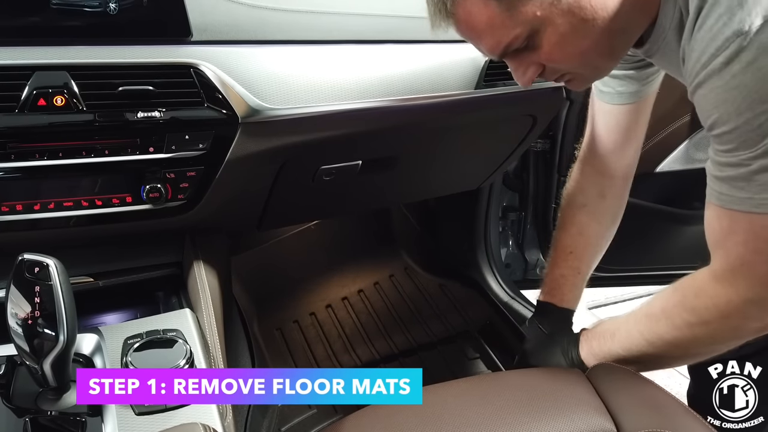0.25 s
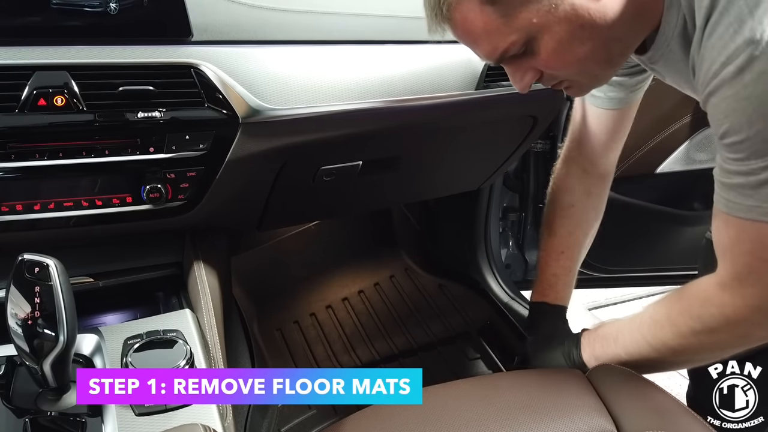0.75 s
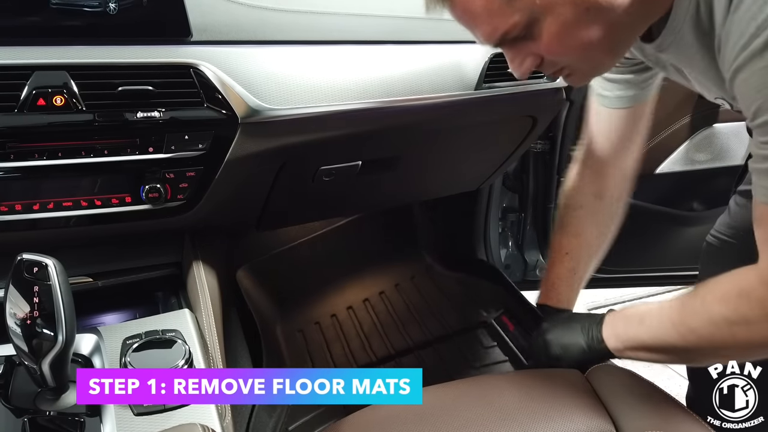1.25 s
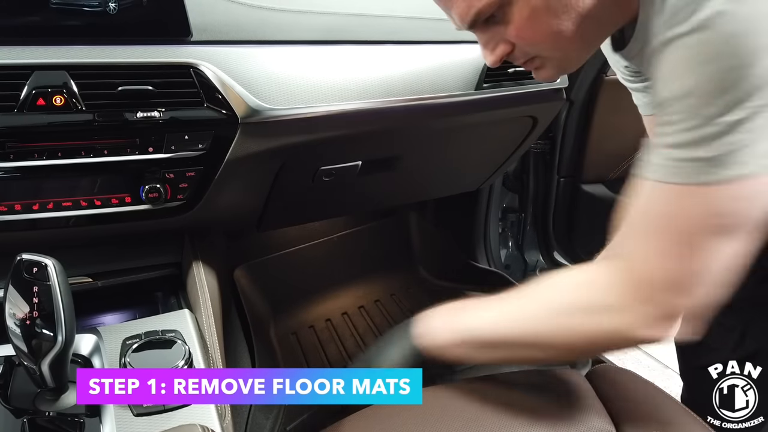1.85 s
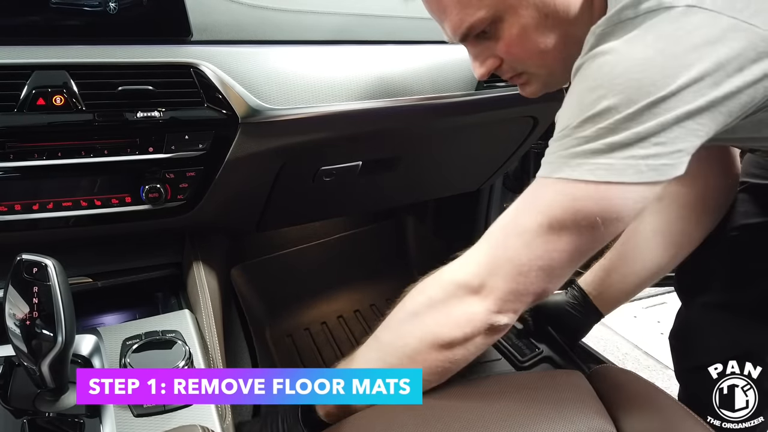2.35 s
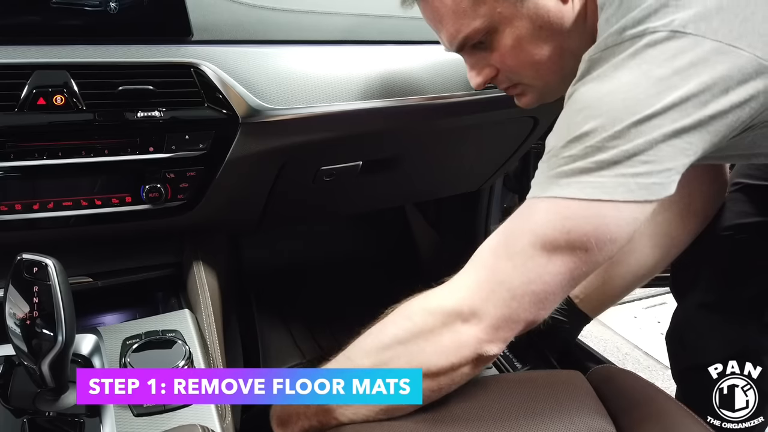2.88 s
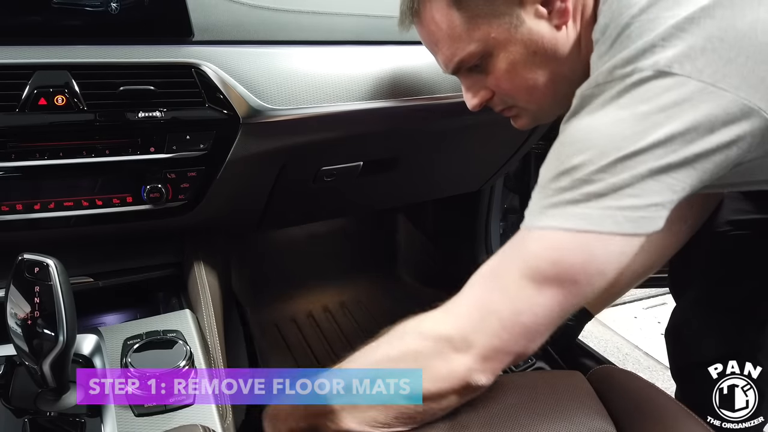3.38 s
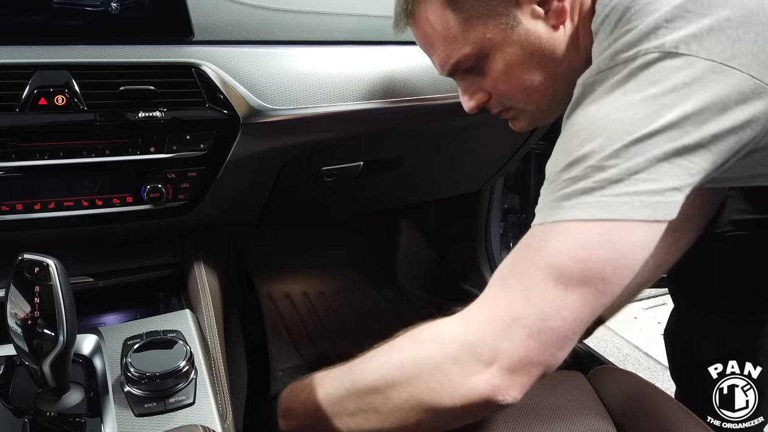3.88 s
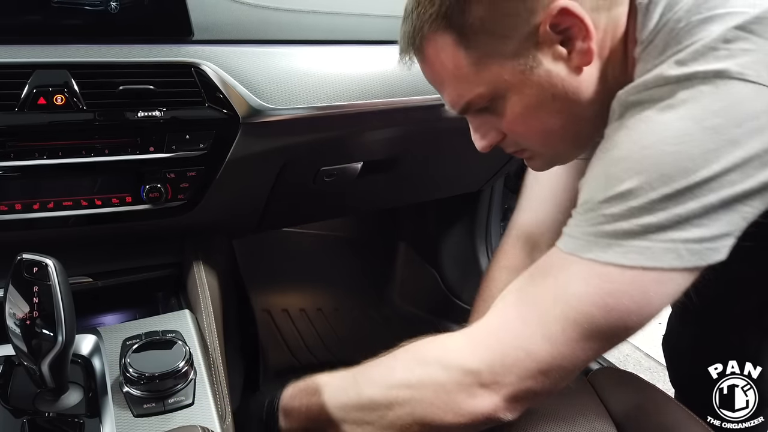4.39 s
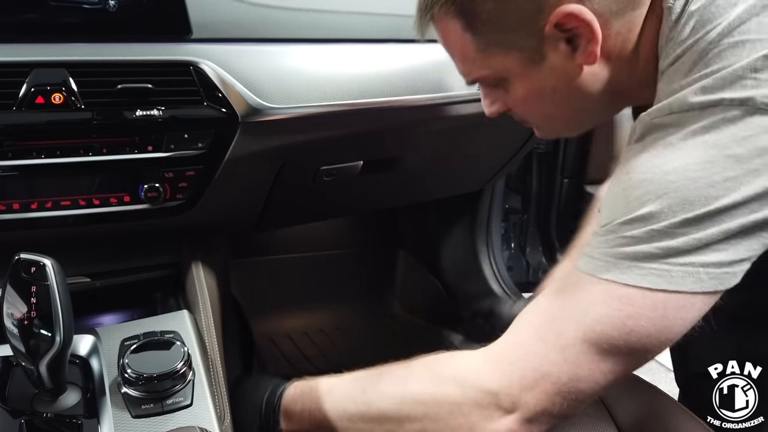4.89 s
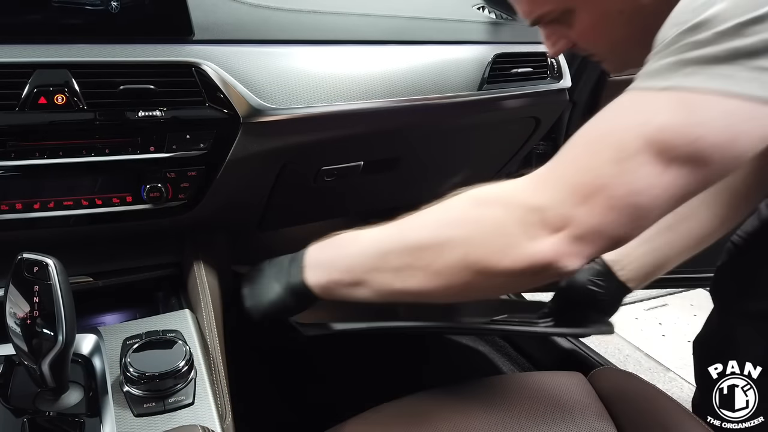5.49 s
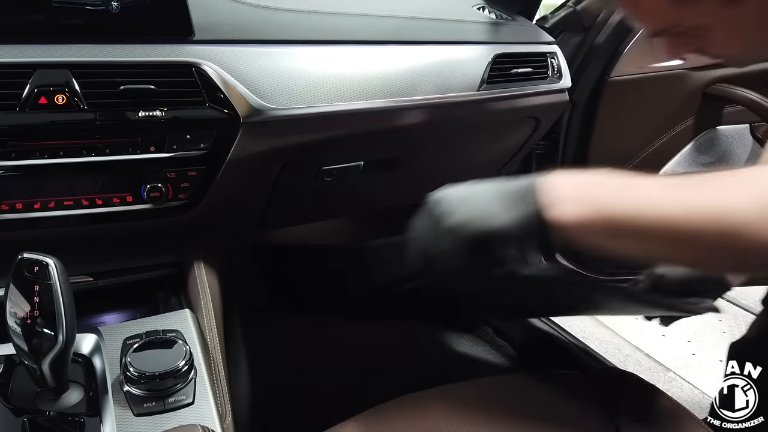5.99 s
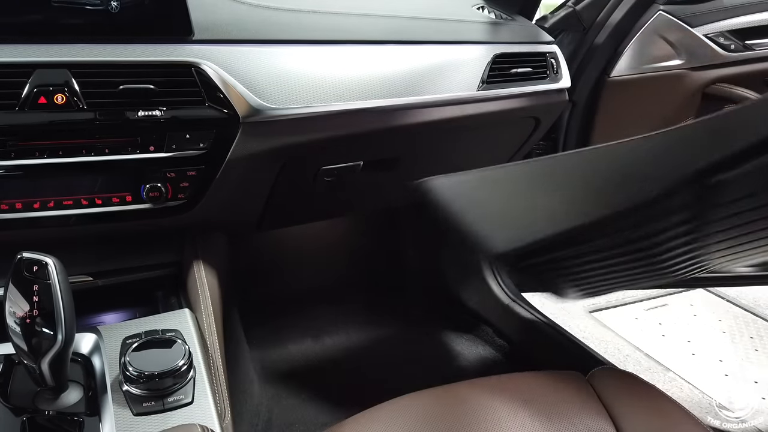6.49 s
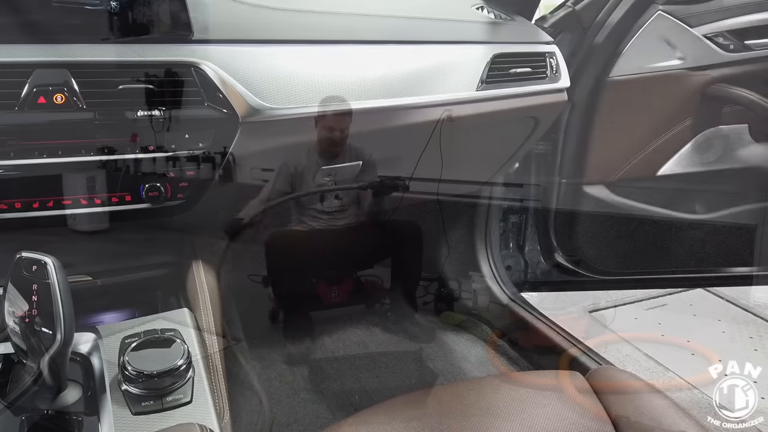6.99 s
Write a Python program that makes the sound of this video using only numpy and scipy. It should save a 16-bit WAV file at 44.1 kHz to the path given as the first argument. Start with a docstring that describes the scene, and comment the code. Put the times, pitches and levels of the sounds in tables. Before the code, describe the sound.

Close inside a padded car cabin, a stiff rubber mat is unclipped with hollow pops and boomy thumps, then dragged in short scuffing pulls over carpet. Soft rubbery creaks, a dry glove crackle and a brief buzzing rasp precede another low thud. The handling then grows sparse and quiet until the mat swishes onto the ground outside. Stereo microphone close by, faint garage echo, low room rumble.

```python
"""Rubber floor mat out of a car footwell

Close by, through an open car door: a stiff mat is unclipped, worked loose and lifted out of the footwell.
Blows ring damped modes of floor pan and mat; pops, cracks and a rim rasp ring or colour short bursts.
Scuffs, groans and the drag over carpet are trains of tiny slips; thin gloves crinkle as clusters of clicks.
The padded cabin is dry and the garage beyond answers faintly with a diffuse echo, over a steady room rumble.
At the end the mat swishes onto the ground outside as fading noise."""
import sys
import numpy as np
from scipy import signal
from scipy.fft import rfft, irfft, next_fast_len
from scipy.io import wavfile
from scipy.ndimage import uniform_filter1d

SR = 44100
rng = np.random.default_rng(int(sys.argv[2]) if len(sys.argv) > 2 else 0)


def pcm_store(signal):
    """Save signal as 16-bit PCM."""
    levels = np.round(np.clip(np.atleast_2d(signal), -1, 1) * 32767)
    wavfile.write(sys.argv[1], SR, levels.astype(np.int16).T)


N = 319725
TIME = np.arange(N) / SR

# the mat bumping the floor: (time [s], boom level [dB], softness [0 stiff rim lands, 1 limp middle])
FLOOR_BLOWS = [(0.308, -35, 0.09), (0.556, -48, 0.4), (0.674, -44.5, 0.29), (1.102, -21.5, 0.22),
               (1.167, -47, 0.64), (1.475, -43, 0.39), (2.619, -44, 0.45), (2.811, -22.5, 0.51),
               (2.912, -47.5, 0.17), (2.935, -39.5, 0.22), (2.994, -21.5, 0.38), (3.028, -39, 0.14),
               (3.249, -50, 0.097), (3.583, -37.5, 1), (3.612, -43.5, 1), (3.955, -30.5, 0.085),
               (4.02, -40, 0.32), (4.19, -38.5, 0.63), (4.209, -41.5, 0.018), (4.358, -40.5, .8),
               (4.445, -35, 0.96), (4.479, -24, 0.49), (5.503, -51.5, 0.47), (5.529, -51, 0.98),
               (5.761, -54.5, 1), (6.505, -41.5, 0.51), (6.516, -39, 0.84)]
# the mat's edge scraping over trim and carpet:
# (time of peak [s], swell and decay constant [s], level [dB], frequency above which it turns dull [Hz])
EDGE_SCUFFS = [(0.302, 0.0093, -46.5, 1413), (1.097, 0.0051, -43.5, 1510), (1.153, 0.027, -56, 2900),
               (1.71, 0.023, -51.5, 1900), (2.6, .018, -56, 1700), (2.974, 0.019, -35, 930),
               (3.043, 0.0077, -48, 2410), (3.338, 0.011, -53, 2220), (3.944, 0.0067, -37, 1790),
               (4.028, 0.0085, -48.5, 1590), (4.387, 0.016, -41.5, 1910), (4.493, 0.0095, -35.5, 1410),
               (4.813, 0.0059, -49.5, 1500), (4.853, 0.006, -40, 1665), (5.632, .028, -57.5, 2700),
               (6.6, .06, -61, 750)]
# rubber sticking and slipping as it bends: (time [s], spread [s], slip rate at the middle [Hz], level [dB])
RUBBER_GROANS = [(1.895, 0.028, 346.7, -52.5), (2.272, 0.02, 378, -49), (2.465, 0.0082, 409, -43.5),
                 (4.859, 0.01, 449, -46.5), (4.997, 0.013, 482, -57)]
# thin gloves and grit crackling:
# (time [s], fall constant [s], level [dB], frequency below which it thins out [Hz])
GLOVE_CRINKLES = [(0.308, 0.0074, -47, 10030), (1.106, 0.043, -52, 9600), (3.148, 0.027, -56, 8900),
                  (3.729, 0.014, -48, 8700), (3.851, 0.0041, -27.5, 4000), (5.631, 0.01, -39, 5000),
                  (6.692, 0.0074, -37.5, 7550)]
# studs leaving their sockets (high) and the moulded mat snapping through (low):
# (time [s], ring frequency [Hz], level [dB])
STUD_POPS = [(.306, 805, -27), (1.103, 668, -28), (2.812, 384, -29.5), (2.913, 546, -38.5),
             (2.995, 617, -31), (3.956, 630, -36), (4.211, 904, -45.5), (4.478, 174.6, -22.5),
             (5.154, 220, -53)]
# the rim whipping or ticking against hard trim: (time [s], brightest frequency [Hz], level [dB])
RIM_CRACKS = [(.307, 1110, -32.5), (1.103, 1410, -32), (1.741, 1310, -56.5), (2.913, 2570, -50),
              (2.997, 2870, -52.5), (3.955, 2000, -38.5), (4.444, 880, -52.5), (4.852, 1050, -56.5),
              (5.506, 1930, -63), (5.546, 756, -61.5), (5.611, 1322, -68.5), (6.563, 480, -58.5)]
# pulls that drag the mat over the carpet:
# (start [s], length [s], rubbing level before trim [dB], carpet hiss level before trim [dB])
CARPET_DRAGS = [(-.1, .17, -60.5, -88), (1.14, 0.1, -55.5, -73.5), (1.443, 0.093, -54.5, -62),
                (1.49, 0.27, -68.5, -65.5), (2.046, 0.16, -75.5, -71.5), (2.438, 0.28, -60, -72.5),
                (2.754, 0.26, -56, -73), (3.095, 0.57, -58.5, -69.5), (3.664, 0.4, -59, -68.5),
                (3.91, 0.12, -60, -54), (4.137, 0.092, -61.5, -67), (4.321, 0.19, -51.5, -60),
                (4.523, 0.13, -56, -75), (4.766, 0.11, -53.5, -64), (4.894, 0.12, -62, -72.5),
                (5.13, 0.3, -63, -73.5), (5.477, 0.16, -60.5, -75), (6.482, 0.3, -69, -72.5)]
# how hard the mat is bent, as its rumble: (time [s], level before lift and trim [dB])
BEND_LEVELS = [(0.0, -55.5), (1.07, -63.5), (1.23, -44.5), (1.94, -59.5), (2.56, -53.5), (2.75, -43.5),
               (3.38, -46.5), (3.76, -61), (4.55, -48), (5.299, -61.5), (5.63, -56), (6.319, -88.5),
               (6.49, -74.5), (6.64, -53), (6.9, -72)]

# floor pan and cabin air: (frequency [Hz], level before scatter [dB], t60 [s])
FLOOR_PAN_MODES = [(32.3, -9, 0.647), (58.4, -2, 0.25), (99, 0, 0.13), (131.5, 5.5, 0.11),
                   (174.5, -8, 0.032), (213.3, -4.5, 0.047)]
# the mat itself: (frequency [Hz], level before scatter [dB], t60 [s])
RUBBER_MAT_MODES = [(370, -1.5, 0.12), (443, -3.5, 0.021), (590, 4, 0.021), (645, -2.5, 0.027),
                    (938, 3, 0.036), (960, -5.5, 0.016)]
# the stiff rim rasping over the sill: (frequency [Hz], level before scatter [dB], t60 [s])
SILL_RIM_MODES = [(370.6, -4, 0.035), (500, 2, 0.018), (638, 1, 0.027), (896, -4.5, 0.036),
                  (1160, -13.5, 0.039), (1400, -6.5, 0.015), (1850, -3.5, 0.02), (2310, -6, 0.018),
                  (2624, -5.5, 0.016), (2950, -8, 0.011)]
# the rubber round a pop: (multiple of the ring frequency, level before scatter [dB], t60 [cycles of the ring])
POP_RUBBER_MODES = [(.73, 2.5, 14), (1.001, 8.5, 17), (1.3, 1.5, 6.2), (1.581, -6, 15), (1.949, -11, 11.9),
                    (2.7, -27.5, 13)]

# spectrum of the ribs slapping down: (frequency [Hz], relative level per Hz [dB])
SLAP_SPECTRUM = [(500, -27), (1000, 0.5), (1500, -3.5), (1900, -6), (2500, -18), (3500, -24), (6000, -35.5),
                 (15000, -58.5)]
# spectrum of the flexing mat's rumble: (frequency [Hz], relative level per Hz [dB])
RUMBLE_SPECTRUM = [(15, -18.5), (32, 6), (62, 2), (90, -13), (150, -10), (280, -29), (600, -62.5)]
# spectrum of nubs rubbing on carpet: (frequency [Hz], relative level per Hz [dB])
RUB_SPECTRUM = [(130, -22.5), (350, 2.5), (600, -3.5), (1000, -3), (1600, -7.5), (2600, -12), (4300, -24),
                (8000, -40.5)]
# spectrum of a scuff: (multiple of the frequency where it turns dull, relative level per Hz [dB])
SCRAPE_SPECTRUM = [(.08, -4), (.27, 0), (.7, -0.5), (1, -3.5), (1.35, -13.5), (2.1, -18), (4.2, -38),
                   (9, -42)]
# spectrum of carpet fibres flicking back: (frequency [Hz], relative level per Hz [dB])
HISS_SPECTRUM = [(1500, -4.5), (3000, 4), (5000, -1.5), (8000, -1), (9500, 1), (10500, 7.5), (11600, -2.5),
                 (15500, -9.5)]
# spectrum of the crinkling clicks: (frequency [Hz], relative level per Hz [dB])
CRINKLE_SPECTRUM = [(1500, -19.5), (4500, -17), (6000, -6), (8000, -1), (9300, -8), (10500, 2),
                    (12000, -10.5), (15500, -13)]
# spectrum of the mat on the garage floor: (frequency [Hz], relative level per Hz [dB])
GROUND_SPECTRUM = [(250, -10.5), (900, -12.5), (2600, -8), (7000, -13.5), (11000, -12), (15000, -27)]
# spectrum of the room air: (frequency [Hz], relative level per Hz [dB])
AIR_SPECTRUM = [(15, -1.5), (45, -3), (70, -9.5), (110, -24.5), (200, -29.5), (1000, -34), (2900, -34),
                (4000, -41), (7000, -46.5), (9500, -43), (10600, -39.5), (12500, -47.5), (15500, -76)]

AIR_DB = -63  # part of the air shared by both ears
LEFT_LAG_SAMPLES = 4
TOP_HZ = 15800  # upper edge of the sound
GROAN_JITTER_HZ = 60
KNOCK_DB, KNOCK_SOFT_DB = -3.5, -23.5  # the mat's knock against the boom, and change at full softness
SLAP_DB, SLAP_SOFT_DB = -9.5, -31  # the same for the slap of the ribs
FLOP_S, FLOP_DB, FLOP_SOFTNESS = 0.058, -19, 0.27  # delay of the flop back; level and softness added
DRAG_ATTACK_S, DRAG_RELEASE_S = 0.042, 0.059
DRAG_SWELL = 0.3  # share by which a pull speeds up towards its middle
FLEX_DB = 5.5  # lift of the bending curve
CREEP_DB = -20  # a bent mat keeps creeping on the carpet: its rubbing against the lifted curve
CRACK_T60_S = 0.041
CRINKLE_RISE_S, CREASE_S, CREASE_DB = 0.004, 0.031, -28.5  # creasing: its spread, and level against the snap
RASP_S, RASP_DB = 3.398, -32  # moment of full pressure; level
RASP_RISE_S, RASP_HOLD_S, RASP_FALL_S = 0.026, 0.014, 0.0085
RASP_SLIP_HZ, RASP_GLIDE_PER_S = 315.4, 0.71  # mean slip rate; share by which the pitch climbs each second
RASP_BITE_S, RASP_GRIT = 0.023, 0.3  # time in which the rim turns bright; noise against the slips


def undb(db):
    """Decibels to gain."""
    return 10 ** (np.asarray(db) / 20)


def unit(x):
    """Scale to rms 1."""
    return x / np.sqrt(np.mean(x ** 2) + 1e-20)


def add(out, start, x):
    """Mix a sound in at a time in seconds."""
    i = int(start * SR)
    out[i:i + len(x)] += x[:N - i]


def colour(x, points):
    """Causal minimum-phase filter through (Hz, dB) points."""
    size = next_fast_len(x.shape[-1] + 8192, True)
    hz, db = np.transpose(points)
    bins_hz = np.arange(size // 2 + 1) * SR / size
    log_gain = np.log(undb(np.interp(np.log(bins_hz + 1), np.log(hz), db)))
    # folding the cepstrum onto positive time makes the filter causal
    cepstrum = irfft(log_gain, size)
    cepstrum[1:size // 2] *= 2
    cepstrum[size // 2 + 1:] = 0
    return irfft(rfft(x, size) * np.exp(rfft(cepstrum)), size)[..., :x.shape[-1]]


def walk(rate, size=N):
    """Smooth random wandering with a spread near 1."""
    k = max(int(SR / rate), 1)
    steps = np.repeat(rng.standard_normal(size // k + 1), k)
    return unit(uniform_filter1d(steps, k)[:size])


def grains(rate, spread_db, size=N):
    """Tiny slips at random moments, most weak and a few strong."""
    struck = rng.random(size) < rate / SR
    sign = rng.choice([-1, 1], size)
    strength = undb(spread_db * np.minimum(rng.exponential(size=size), 4))
    return unit(struck * sign * strength)


def slip_train(rate_hz, spread_db):
    """Stick-slip: one pulse for each whole turn of a wandering rate, uneven in strength."""
    turns = np.cumsum(rate_hz) / SR
    slips = np.diff(np.floor(turns), prepend=0) * undb(spread_db * walk(400, size=len(turns)))
    return unit(slips - slips.mean())


def fade(t, t60):
    """Exponential decay by 60 dB in t60 seconds."""
    return np.exp(-np.log(1000) * t / t60)


def ring(modes, t, scatter_db, detune):
    """Damped modes; each place of contact weights and loads them a little differently."""
    chance = rng.standard_normal((len(modes), 2))
    out = 0
    for k, ((hz, db, t60), (a, b)) in enumerate(zip(modes, chance)):
        gain = (-1) ** k * undb(db + scatter_db * a)
        out = out + gain * np.sin(2 * np.pi * hz * (1 + detune * b) * t) * fade(t, t60)
    return out


def blow(x, db):
    """Set the rms level of the first 43 ms of a hit."""
    return x * undb(db) / np.sqrt(np.mean(x[:int(.043 * SR)] ** 2))


def air():
    """Faint steady room rumble under a fine hiss, a shared part and an opposed part at the two ears."""
    mid, side = colour(rng.standard_normal((2, N)), AIR_SPECTRUM)
    wide = colour(side, [(100, -5.0), (600, 0.5), (2500, -4.0), (8000, 1.5)])
    return undb(AIR_DB) * (mid + np.array([[1], [-1]]) * wide) / np.std(mid)


def reflections(t60, build, points):
    """A diffuse echo of noise that builds up and dies away, of unit energy before its colouring."""
    t = TIME[:int(t60 * SR)]
    echoes = rng.standard_normal(2 * SR)[:len(t)] * fade(t, t60) * (1 - np.exp(-t / build))
    return colour(echoes / np.linalg.norm(echoes), points)


def garage(near, clatter):
    """The open door lets sound into the distant garage, the sharp cracks most of all."""
    points = [(80, -17.0), (380, -2.5), (750, -1.5), (1550, -4.5), (2300, -10), (4500, 3.0), (10000, 0.0)]
    hall = reflections(t60=1.089, build=0.042, points=points)
    return signal.fftconvolve(undb(-23) * near + undb(-22) * clatter, hall)[:N]


def cabin(ear):
    """Treble off glass and dashboard; two scatterings trade places as the mat and arms shift the paths."""
    scatter = [(150, -45), (600, -30.5), (1200, -23.0), (2200, -5.5), (5000, -3.5), (15000, -7.5)]
    first, second = (signal.oaconvolve(ear, reflections(t60=0.047, build=0.00043, points=scatter))[:N]
                     for _ in range(2))
    turn = 7 * TIME  # steady, in radians
    return np.cos(turn) * first + np.sin(turn) * second


def outside(start=6.92, rise=0.012, level_db=-52):
    """The mat swishes onto the garage floor; the treble dies first in the big room."""
    t = np.maximum(TIME - start, 0)
    swish = unit(colour(rng.standard_normal((2, N)), GROUND_SPECTRUM))
    dull = colour(swish, [(2500, 13.5), (5000, 8.0), (8000, -1.0), (15000, -9.5)])
    dying = dull * fade(t, 0.62) + (swish - dull) * fade(t, 0.4)
    return undb(level_db) * (1 - np.exp(-t / rise)) * dying


def pile(hiss_db):
    """Carpet fibres flick back all across the footwell, so the two ears share only part of the hiss."""
    shared, left, right = (grains(9000, spread_db=1.5) for _ in range(3))
    hiss = unit(colour(shared + 0.16 * np.array([left, right]), HISS_SPECTRUM))
    patchy_db = 1.5 * walk(25) + 2 * walk(160)
    return hiss * undb(hiss_db + patchy_db + 3.65)


def bending():
    """Curve of the flexing in dB; it dies away once the mat is clear of the car."""
    s, db = np.transpose(BEND_LEVELS)
    return np.interp(TIME, s, db) + FLEX_DB - 200 * np.maximum(TIME - s[-1], 0)


def drags():
    """Curves of rubbing and of carpet hiss in dB: each pull gathers speed, swells and runs out."""
    rub = hiss = undb(-100) ** 2  # summed as powers above a floor
    for start, length, rub_db, hiss_db in CARPET_DRAGS:
        since = TIME - start
        attack = np.clip(since / DRAG_ATTACK_S, 0, 1)
        release = np.exp(-np.maximum(since - length, 0) / DRAG_RELEASE_S)
        swell = 1 + DRAG_SWELL * (np.sin(np.pi * np.clip(since / length, 0, 1)) - .5)
        speed = attack * release * swell
        rub = rub + (speed * undb(rub_db)) ** 2
        hiss = hiss + (speed * undb(hiss_db)) ** 2
    return 10 * np.log10(rub), 10 * np.log10(hiss)


def nub_catches():
    """Nubs catching on the carpet: dense slips and sparse strong ones, in small random swells."""
    slips = grains(1500, spread_db=2.5) + .7 * grains(90, spread_db=2.5)
    return slips * undb(2.8 * walk(45))


def sliding(flex_db, rub_db):
    """The dragged mat flexes; its coarse and fine nubs catch on the carpet, each in their own time."""
    flex = unit(colour(rng.standard_normal(N), RUMBLE_SPECTRUM)) * undb(flex_db - 3.0)
    coarse = colour(nub_catches(), [(900, -0.5), (1700, -13.5)])
    fine = colour(nub_catches(), [(700, -13.5), (1400, 0)])
    return flex + unit(colour(coarse + fine, RUB_SPECTRUM)) * undb(rub_db - 1.5)


def crinkles():
    """Bright clusters of clicks, thinner for a smaller fold; soft creasing leads in and trails after."""
    out, t = np.zeros(N), np.arange(-SR // 8, SR // 4) / SR
    for start, fall, db, thin_hz in GLOVE_CRINKLES:
        snap = np.exp(-np.maximum(-t / CRINKLE_RISE_S, t / fall))
        crease = undb(CREASE_DB) * np.exp(-np.abs(t) / CREASE_S)
        clicks = colour(grains(7000, spread_db=6.5, size=len(t)), CRINKLE_SPECTRUM)
        clicks = unit(colour(clicks, [(0.79 * thin_hz, -13), (thin_hz, 0)]))
        add(out, start + t[0], undb(db) * (snap + crease) * clicks)
    return out


def groans():
    """Uneven slips that slow as the strain eases; soft rubber passes little but the lowest partial."""
    out = np.zeros(N)
    rubber = [(150, -4.0), (330, -9.0), (460, -6.5), (750, -26.0), (1300, -25.0), (2000, -38.5), (8000, -45.0)]
    for middle, half, hz, db in RUBBER_GROANS:
        t = np.arange(-3 * half, 3 * half, 1 / SR)
        rate_hz = hz - 14 * t / half + GROAN_JITTER_HZ * walk(400, size=len(t))
        slips = slip_train(rate_hz, spread_db=2.4) + 0.15 * rng.standard_normal(len(t))
        creak = unit(colour(slips, rubber))
        add(out, middle - 3 * half, creak * undb(db) * np.exp(-(t / half) ** 2 / 2))
    return out


def scuffs():
    """Stuttering bursts of slips that build under the pull and die away as the edge comes free."""
    out = np.zeros(N)
    for peak, half, db, dull_hz in EDGE_SCUFFS:
        t = np.arange(-5 * half, 5 * half, 1 / SR)
        pressure = np.exp(-np.abs(t) / half)
        slips = grains(3500, spread_db=2, size=len(t)) * undb(2.5 * walk(220, size=len(t)))
        spectrum = [(multiple * dull_hz, band_db) for multiple, band_db in SCRAPE_SPECTRUM]
        scrape = unit(colour(slips, spectrum))
        add(out, peak - 5 * half, undb(db) * pressure * scrape)
    return out


def rim_rasp():
    """Slips over the sill ring the rim, higher as it stretches, brighter as it bites, until it jumps free."""
    t = np.arange(-4 * RASP_RISE_S, RASP_HOLD_S + 6 * RASP_FALL_S, 1 / SR)
    pressure = np.exp(np.minimum(t, 0) / RASP_RISE_S - np.maximum(t - RASP_HOLD_S, 0) / RASP_FALL_S)
    slips = slip_train(RASP_SLIP_HZ * (1 + .35 * walk(500, size=len(t))), spread_db=2.5)
    slips = slips + RASP_GRIT * rng.standard_normal(len(t))
    rim = signal.fftconvolve(slips, ring(SILL_RIM_MODES, t - t[0], scatter_db=1, detune=0.005))[:len(t)]
    # reading the ring ever faster raises its pitch
    rim = unit(np.interp(t + RASP_GLIDE_PER_S * t ** 2 / 2, t, rim))
    dull = colour(rim, [(900, 0), (1800, -6)])
    bright = colour(rim, [(600, -3.5), (1500, 3.0), (2950, 0.0), (3500, 0.5)])
    bite = np.clip(1 + t / RASP_BITE_S, 0, 1)
    out = np.zeros(N)
    add(out, RASP_S + t[0], undb(RASP_DB) * pressure * (bite * bright + (1 - bite) * dull))
    return out


def cracks():
    """Short decaying noise bursts, a clatter where the rim meets hard trim."""
    out, t = np.zeros(N), TIME[:SR // 8]
    for start, hz, db in RIM_CRACKS:
        contact = rng.standard_normal(len(t)) * fade(t, CRACK_T60_S)
        trim = [(hz / 4, -16), (0.5 * hz, -3), (hz, 0), (1.32 * hz, -9), (1.8 * hz, -24), (5 * hz, -45)]
        add(out, start, blow(colour(contact, trim), db))
    return out


def pops():
    """Strained rubber lets go all at once with a hollow pop and a short rasp."""
    out, t = np.zeros(N), TIME[:SR // 4]
    for start, hz, db in STUD_POPS:
        modes = [(hz * multiple, mode_db, cycles / hz) for multiple, mode_db, cycles in POP_RUBBER_MODES]
        pop = ring(modes, t, scatter_db=4.0, detune=0.063) * (1 - np.exp(-(t / 0.00027) ** 2))
        band = [(hz / 3, -22), (hz * 0.37, 0), (hz * 1.9, 0), (hz * 2.46, -11), (hz * 5, -45)]
        rasp = colour(rng.standard_normal(len(t)) * fade(t, 0.046), band)
        # a large panel flips slowly, so low pops lose their upper partials
        softness = np.clip(1 - hz / 400, 0, 1)
        pop = colour(blow(pop, 0) + blow(rasp, -9.5), [(1.1 * hz, 0), (2 * hz, -25 * softness)])
        add(out, start, blow(pop, db))
    return out


def thump(boom_db, softness):
    """A blow booms in the floor pan, knocks in the mat and slaps as the ribs land."""
    t = TIME[:SR // 2]
    push = 1 - np.exp(-t / (.001 + .003 * softness))  # a softer landing pushes more slowly
    knock_db = boom_db + KNOCK_DB + KNOCK_SOFT_DB * softness
    slap_db = boom_db + SLAP_DB + SLAP_SOFT_DB * softness
    landing = rng.standard_normal((3, len(t))) * (1 - np.exp(-t / 0.00051)) ** 2
    settling = fade(t, 0.075) + undb(-13.5) * fade(t, 0.21)
    # seats and trim add a dense low shudder to the pan's own modes
    padding = [(30, -9.0), (70, 3.0), (200, -2.5), (300, -17.0), (600, -34.5), (2000, -70.0)]
    shudder = colour(landing[2] * fade(t, 0.17), padding)
    pan = ring(FLOOR_PAN_MODES, t, scatter_db=-1.5, detune=0.025) * push
    boom = blow(pan, 0) + blow(shudder, -3.0)
    rib_band = [(120, -36), (320, 8.0), (600, 13), (950, -11.5), (1500, -26.0), (4000, -60.0)]
    ribs = colour(landing[0] * settling, rib_band)
    mat = ring(RUBBER_MAT_MODES, t, scatter_db=-2.5, detune=0.069) * (1 - np.exp(-t / 0.00037))
    knock = blow(mat, 0) + blow(ribs, 2.7)
    slap = colour(landing[1] * settling, SLAP_SPECTRUM)
    return blow(boom, boom_db) + blow(knock, knock_db) + blow(slap, slap_db)


def thumps():
    """The mat lands, then flops back once, weaker and softer."""
    out = np.zeros(N)
    for start, db, softness in FLOOR_BLOWS:
        add(out, start, thump(db, softness))
        add(out, start + FLOP_S, thump(db + FLOP_DB, softness + FLOP_SOFTNESS))
    return out


def scene():
    """The footwell lies close and to the right, so the left ear hears it slightly later."""
    flex_db = bending()
    pull_db, hiss_db = drags()
    rub_db = np.maximum(pull_db, flex_db + CREEP_DB)
    clatter = cracks()
    near = sliding(flex_db, rub_db) + crinkles() + groans() + scuffs()
    near = near + rim_rasp() + clatter + pops() + thumps()
    near = near + garage(near, clatter)
    left = np.pad(near, (LEFT_LAG_SAMPLES, 0))[:N]
    ears = np.array([left, near]) + pile(hiss_db)
    # bass arrives straight; most treble comes off glass and dashboard, by other paths to each ear
    direct = colour(ears, [(1200, 0.5), (2500, -3.0), (5000, -17.0), (15000, -6.5)])
    return direct + np.array([cabin(ear) for ear in ears]) + outside() + air()


def record(dry):
    """Trim the deepest bass and everything above the upper edge."""
    bass_cut = signal.butter(2, 18, "high", fs=SR, output="sos")
    top_cut = signal.ellip(8, .2, 70, TOP_HZ, fs=SR, output="sos")
    return signal.sosfilt(top_cut, signal.sosfilt(bass_cut, dry))


dry = scene()
out = record(dry)
pcm_store(out)
```